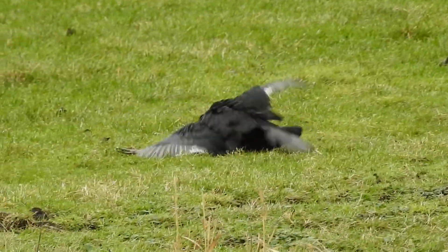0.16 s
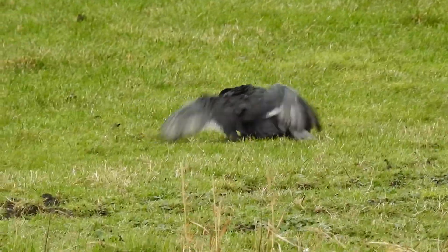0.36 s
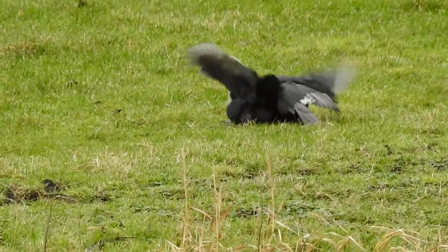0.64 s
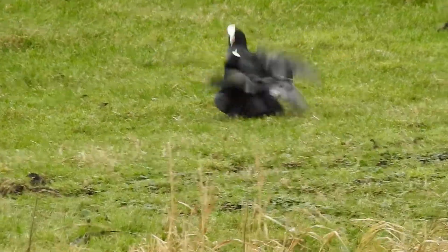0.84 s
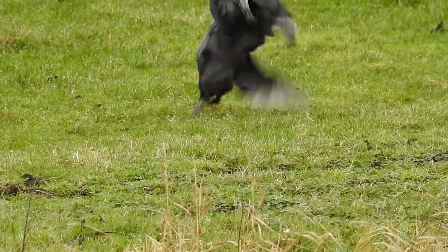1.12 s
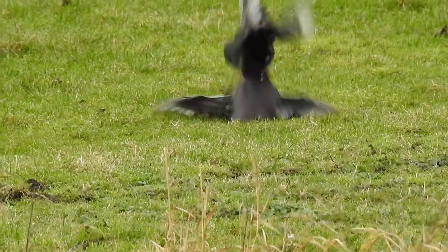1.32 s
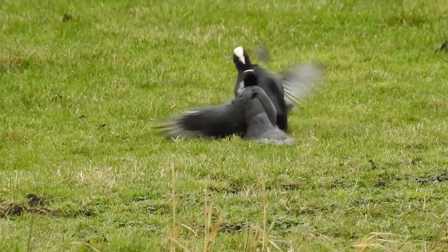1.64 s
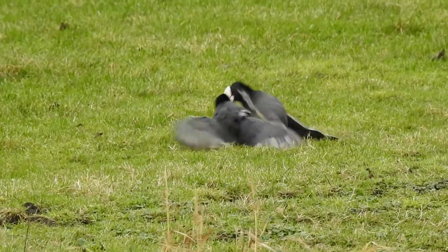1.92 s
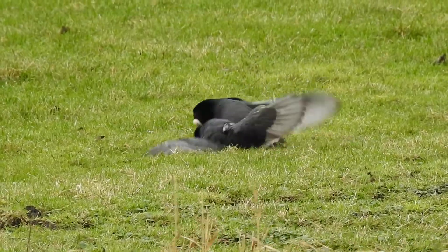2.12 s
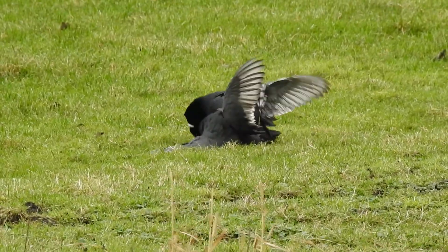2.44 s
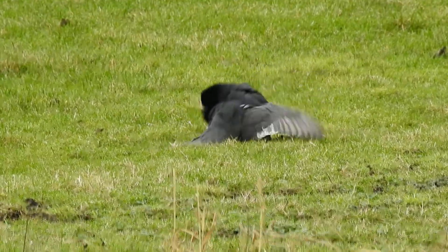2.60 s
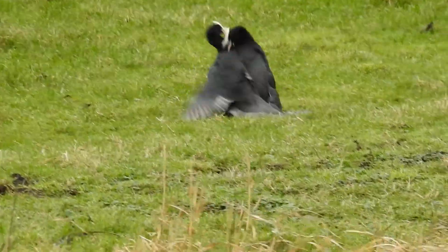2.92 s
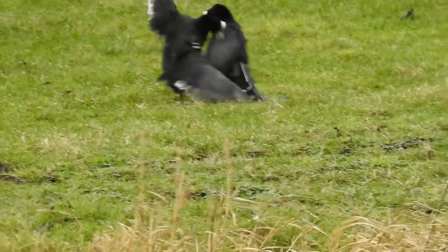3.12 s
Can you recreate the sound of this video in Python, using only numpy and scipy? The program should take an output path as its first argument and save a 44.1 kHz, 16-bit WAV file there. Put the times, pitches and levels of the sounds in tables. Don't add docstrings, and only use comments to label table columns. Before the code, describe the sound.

Wind buffets a small camera's stereo microphone in an open field, low fluttering thuds coming in clusters over a distant roar and grass hiss; two tiny water bird squeaks, then faint hoarse bird rasps.

```python
import sys
import numpy as np
from scipy import signal
from scipy.fft import rfft, irfft, next_fast_len
from scipy.io import wavfile
from scipy.ndimage import uniform_filter1d, map_coordinates

SR = 44100
rng = np.random.default_rng(int(sys.argv[2]) if len(sys.argv) > 2 else 0)


def ratio_of_db(decibels):
    return 10 ** (np.asarray(decibels, float) / 20)


def digitize_waveform(pressure):
    field = np.atleast_2d(pressure).T
    bounded = np.clip(field, -1, 1)
    quanta = np.round(bounded * 32767).astype(np.int16)
    wavfile.write(sys.argv[1], SR, quanta)


N = 143766


def unit(x):
    return x / np.sqrt(np.mean(x ** 2) + 1e-20)


def along(points, hz):
    f, value = np.transpose(points)
    return np.interp(np.log(hz + 1), np.log(f + 1), value)


def wobble(rate):
    return map_coordinates(rng.standard_normal(400), [np.arange(N) * rate / SR])


def filtered(x, response):
    m = next_fast_len(N + SR // 2)
    return irfft(rfft(x, m) * response(np.fft.rfftfreq(m, 1 / SR)), m)[..., :N]


def swell(start, length, attack, release):
    t = np.arange(N) / SR - start
    return np.clip(np.minimum(t / attack, (length - t) / release), 0, 1)


def rush(spectrum, alike, patchy_db):
    z = signal.stft(rng.standard_normal((2, N)), nperseg=512)[2]
    patches = uniform_filter1d(rng.standard_normal(z.shape[1:]), size=6, axis=0)
    patches = uniform_filter1d(patches, size=14, axis=1)
    pair = signal.istft(z * ratio_of_db(patchy_db * unit(patches)), nperseg=512)[1][:, :N]

    def mid_side(hz):
        turn = np.arccos(np.clip(along(alike, hz), -1, 1)) / 2
        return ratio_of_db(along(spectrum, hz)) * [np.cos(turn), np.sin(turn)]

    mid, side = filtered(pair, mid_side)
    return unit(np.array([mid + side, mid - side]))


def from_side(x, lag_s):
    treble_db = 0.9
    side = np.array([[0.5], [-0.5]])
    return filtered(x, lambda hz: ratio_of_db(side * treble_db * np.clip(hz / 4000, 0, 1))
                    * np.exp(-2j * np.pi * hz * side * lag_s))


def field():
    # (frequency [Hz], density [dB per Hz])
    roar_colour = [(120, -26), (250, 4), (500, 2), (750, 1.5), (1100, 3.5), (1500, -0.5), (1850, -5),
                   (2050, -9.5), (2800, -51)]
    # (frequency [Hz], density [dB per Hz])
    hiss_colour = [(1500, -40), (2100, -1), (3400, -.5), (4300, -3), (6500, -4), (7600, -17), (9000, -26),
                   (11000, -33), (16000, -51)]
    # (frequency [Hz], likeness [-1 to 1])
    alike = [(200, 0.17), (500, .6), (1000, .88), (1800, 0.98), (3500, 0.85), (7000, 0.2), (10000, 0.01),
             (16000, .01)]
    roar = ratio_of_db(-25 + 0.51 * wobble(8.1)) * rush(roar_colour, alike, patchy_db=1.5)
    hiss = ratio_of_db(-34 + 0.51 * wobble(1.5)) * rush(hiss_colour, alike, patchy_db=1.06)
    return roar + hiss


def evened(x):
    span_s, share = 0.0232, 0.89
    power = np.abs(uniform_filter1d(x ** 2, round(span_s * SR), axis=1)) + 1e-3
    return unit(x / power ** (share / 2))


def crackle(force):
    # (frequency [Hz], density [dB per Hz])
    tick_colour = [(3000, -55), (8000, -1.5), (12000, 2), (16000, -3)]
    # (time [s], peak level [dB], left over right [dB])
    sharp_ticks = [(0.5974, -51, -0.5), (0.6064, -58, -1.0), (1.1593, -47, 2.0), (1.1842, -49, 1.0),
                   (1.3154, -50, -1.0), (1.4272, -51, -1), (2.2702, -49, 0), (2.3136, -48, 1.0),
                   (2.3294, -46, 0.5), (2.38, -48, -3), (2.4184, -50, -1), (2.4758, -45, -1),
                   (2.4914, -49, 0), (2.5024, -48, 1.5), (2.5326, -42.5, 0.5), (2.6564, -54, -1),
                   (3.056, -50, -2.5), (3.0689, -46, -4), (3.1044, -57, -2), (3.1358, -40, -4.5),
                   (3.1544, -57, 3), (3.1694, -51, 1), (3.1864, -47, -1)]
    per_s, faint_db, grows = 220, -73, 1.3
    sharp_db, decay_s = 1, 0.0015
    colour = lambda hz: ratio_of_db(along(tick_colour, hz))

    struck = rng.random((2, N)) < per_s / SR
    faint = unit(filtered(struck * rng.standard_normal((2, N)), colour))
    sharp, t = np.zeros((2, N)), np.arange(300) / SR
    for start, db, pan_db in sharp_ticks:
        size = ratio_of_db(db + sharp_db + np.array([[pan_db], [-pan_db]]) / 2)
        burst = size * np.exp(-t / decay_s) * rng.standard_normal((2, len(t)))
        sharp[:, round(start * SR):][:, :len(t)] += burst
    return ratio_of_db(faint_db) * (force / ratio_of_db(-14)) ** grows * faint + filtered(sharp, colour)


def buffeting():
    # (centre [s], length [s], level [dB])
    puffs = [(-0.013, 0.068, -21), (0.246, 0.038, -28), (0.3, 0.073, -36), (0.354, 0.022, -17),
             (0.426, 0.05, -20.5), (0.463, 0.023, -23.5), (0.515, 0.038, -16), (0.525, 0.041, -16.5),
             (0.564, 0.053, -17), (0.613, 0.052, -12), (0.646, 0.039, -16.5), (0.695, 0.037, -13.5),
             (0.76, 0.079, -25.5), (.843, 0.029, -16.5), (0.872, 0.049, -17.5), (0.923, 0.033, -24),
             (0.983, 0.0084, -15), (1.07, 0.023, -15.5), (1.114, .04, -23.5), (1.154, 0.029, -14.5),
             (1.2, 0.032, -10), (1.232, 0.016, -15), (1.257, 0.033, -13.5), (1.284, 0.019, -12),
             (1.33, 0.052, -9), (1.377, 0.057, -14.5), (1.427, 0.043, -15.5), (1.524, 0.052, -20.5),
             (1.568, .03, -29.5), (1.658, 0.0095, -21.5), (1.776, 0.014, -22.5), (1.83, 0.022, -26),
             (1.922, .021, -28.5), (2.176, 0.043, -22), (2.22, 0.064, -21), (2.273, 0.034, -11),
             (2.318, 0.034, -10.5), (2.348, 0.058, -9.5), (2.392, 0.026, -13.5), (2.423, 0.028, -10),
             (2.469, 0.026, -16), (2.497, .04, -7), (2.553, 0.039, -8.5), (2.594, 0.037, -17),
             (2.622, 0.04, -16.5), (2.661, 0.039, -9), (2.706, 0.032, -19.5), (2.753, 0.032, -16.5),
             (2.792, 0.039, -26.5), (2.819, 0.023, -29), (2.943, 0.024, -21.5), (3.01, .05, -20.5),
             (3.064, 0.034, -13), (3.08, 0.019, -3.5), (3.113, 0.04, -7), (3.162, 0.044, -5),
             (3.193, 0.027, -9.5), (3.221, 0.048, -13), (3.26, .04, -11)]
    # (frequency [Hz], density [dB per Hz])
    thud_colour = [(60, -29), (95, -18.5), (125, 0), (180, 3.5), (250, -3), (350, -10), (550, -20.5),
                   (900, -52), (1500, -120)]
    # (frequency [Hz], density [dB per Hz])
    edge_colour = [(100, -64.5), (180, -6), (280, 2.5), (420, -8), (650, -18), (1000, -28), (2500, -85),
                   (4000, -120)]
    # (frequency [Hz], density [dB per Hz])
    rumble_colour = [(10, -28), (25, -38), (50, -11.5), (90, -7.5), (130, 0), (200, -70), (300, -120)]
    # (frequency [Hz], likeness [-1 to 1])
    alike = [(60, 0.5), (150, 0.02), (400, 0.11)]
    breeze_db, flutter_db, steepness = -31.5, 0.7, 2.7
    edge_db, edge_grows, edge_span_s = 6, 2.35, 0.052
    rumble_db, rumble_grows, rumble_span_s = -38.5, 0.43, 0.045

    t = np.arange(N) / SR
    power = np.full(N, ratio_of_db(breeze_db) ** 2)
    for centre, length, db in puffs:
        power += ratio_of_db(db) ** 2 * np.exp(-np.abs(2.08 * (t - centre) / length) ** steepness)
    slow = np.sqrt(np.abs(uniform_filter1d(power, round(rumble_span_s * SR))))
    gust = np.sqrt(np.abs(uniform_filter1d(power, round(edge_span_s * SR))))
    force = np.sqrt(power) * ratio_of_db(flutter_db * wobble(50))

    brightness = ratio_of_db(edge_db) * (gust / ratio_of_db(-6)) ** (edge_grows - 1)
    body = rush(thud_colour, alike, patchy_db=4)
    edge = brightness * rush(edge_colour, alike, patchy_db=-0.5)
    thud = force * evened(body + edge)
    rumble_level = ratio_of_db(rumble_db) * (slow / ratio_of_db(-29)) ** rumble_grows
    rumble = rumble_level * rush(rumble_colour, alike, patchy_db=-3.0)
    return thud + crackle(force) + rumble


def squeaks():
    # (start [s], length [s], top pitch [Hz], level [dB], shrillness [dB])
    calls = [
        (0.851, 0.03, 1094, -28, -5),
        (1.654, 0.045, 1103, -28, 3.5),
    ]
    # (multiple of the pitch, level [dB])
    overtones = [(2, -20), (3, 0), (4, -1.5), (5, 0), (6, -3), (7, -12), (8, -13), (9, -29), (10, -25)]
    rise, peak_share, sag_per_s = 0.06, 0.3, 2.3
    dulls_db_per_s, shrill_grows_per_s = 55, 36
    pan_db = 2.5
    out = np.zeros(N)
    for start, length, top_hz, db, shrill_db in calls:
        t = np.arange(N) / SR - start - peak_share * length
        climb = rise * (t / (peak_share * length)) ** 2
        sag = sag_per_s * t * np.sqrt(np.abs(t) / (0.7 * length))
        fall = np.clip(np.where(t < 0, climb, sag), 0, 0.3)
        pitch = top_hz * (1 - fall + 0.004 * wobble(110))
        phase = 2 * np.pi * np.cumsum(pitch) / SR
        voice = np.zeros(N)
        for k, level in overtones:
            dulled = dulls_db_per_s * np.clip(t, 0, 1) * (k - 3) * (k != 8)
            growth = np.clip(1 + shrill_grows_per_s * t * (k < 9), 0, 2)
            shrill = shrill_db * growth * np.sign(k - 7.5) * (k > 6)
            gain = ratio_of_db(level - dulled + shrill + 2 * wobble(110))
            voice += gain * np.sin(k * phase + rng.uniform(0, 2 * np.pi))
        out += ratio_of_db(db) * swell(start, length, 0.003, 0.007) * voice
    return out * ratio_of_db([[pan_db / 2], [-pan_db / 2]])


def far_pipes():
    # (start [s], length [s], pitch [Hz], level [dB])
    pipes = [
        (1.585, .04, 2450, -41),
        (.905, .02, 2850, -41),
        (1.07, .025, 3250, -43),
    ]
    t = np.arange(N) / SR
    out = np.zeros(N)
    for start, length, hz, db in pipes:
        tone = np.sin(2 * np.pi * hz * t + 0.69 * wobble(41))
        out += ratio_of_db(db) * swell(start, length, 0.0073, 0.0051) * tone
    return out


def far_rasps():
    # (start [s], length [s], pulse rate [Hz], throat [Hz], level [dB])
    rasps = [
        (2.075, .085, 272, 3220, -36),
        (2.163, .065, 272, 3230, -34),
        (2.225, .1, 275, 3380, -36),
        (2.415, .065, 280, 3320, -35.5),
    ]
    jitter, width_hz = 0.016, 620
    out = np.zeros(N)
    for start, length, rate_hz, hz, db in rasps:
        cycles = np.cumsum(rate_hz * (1 + jitter * wobble(100))) / SR
        pulses = (np.diff(np.floor(cycles), prepend=0) > 0) * ratio_of_db(3 * rng.standard_normal(N))
        throat = lambda f: (1j * f * width_hz / (hz * hz - f * f + 1j * f * width_hz)) ** 2
        out += ratio_of_db(db) * swell(start, length, 0.008, 0.006) * unit(filtered(pulses, throat))
    return out


def scene():
    # (centre [Hz], width [Hz], depth [0-1])
    hollow = (3950, 250, .45)
    hz, width, depth = hollow
    birds = squeaks() + far_pipes() + far_rasps()
    air = from_side(field(), lag_s=45e-6) + from_side(birds, lag_s=37e-6)
    housed = filtered(air, lambda f: 1 - depth * np.exp(-((f - hz) / width) ** 2))
    return housed + buffeting()


def band_limit(x):
    return signal.sosfilt(signal.butter(12, 15760, fs=SR, output="sos"), x)


def record(dry):
    # (time [s], gain drop [dB])
    surges = [(0.598, 3), (1.192, 4.5), (1.321, 6), (2.326, 4), (2.348, 7.5), (2.389, 2.5), (2.485, 5.5),
              (2.542, 4), (2.66, 4), (3.07, 10.5), (3.105, 8.5), (3.137, 6.5), (3.157, 10), (3.185, 7.5)]
    drop_s, recover_s = 0.001, 0.021
    clip_top, clip_hard = 0.95, 5
    t = np.arange(N) / SR
    drops = []
    for start, db in surges:
        onset = np.clip((t - start) / drop_s, 0, 1)
        recovery = np.exp(-(np.maximum(t - start, 0) / recover_s) ** 2)
        drops.append(db * onset * recovery)
    x = dry * ratio_of_db(-np.max(drops, axis=0))
    x = x / (1 + np.abs(x / clip_top) ** clip_hard) ** (1 / clip_hard)
    return band_limit(x)


dry = scene()
out = record(dry)
digitize_waveform(out)
```